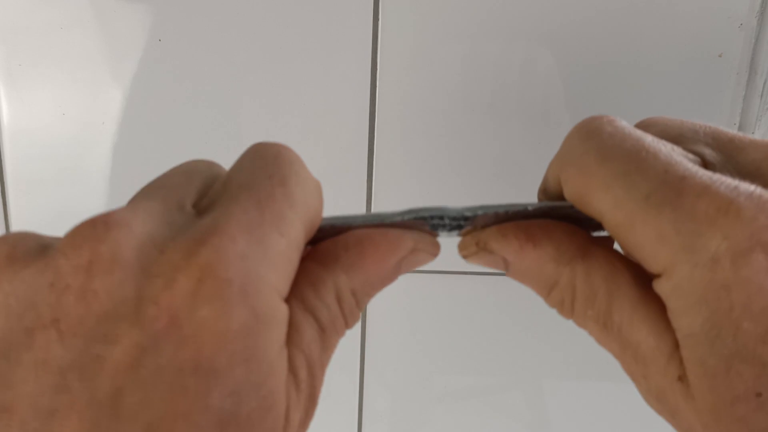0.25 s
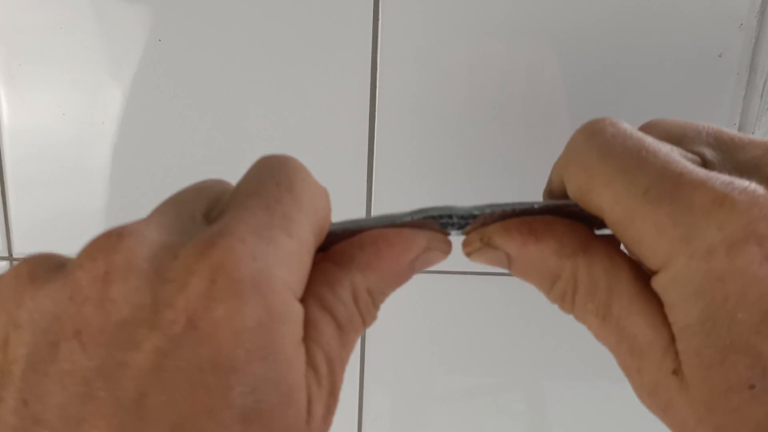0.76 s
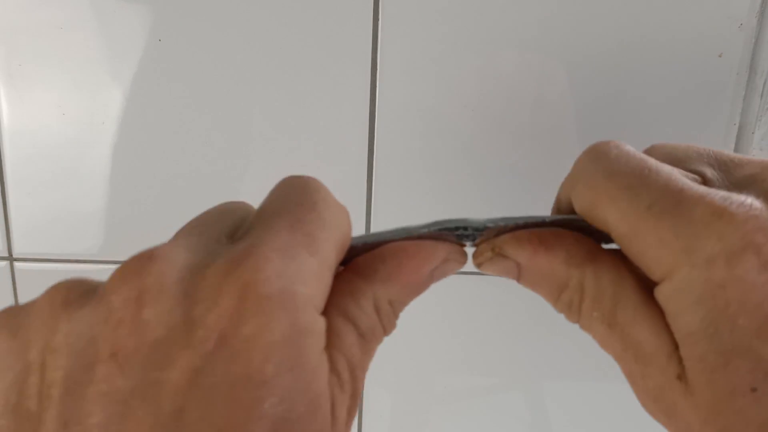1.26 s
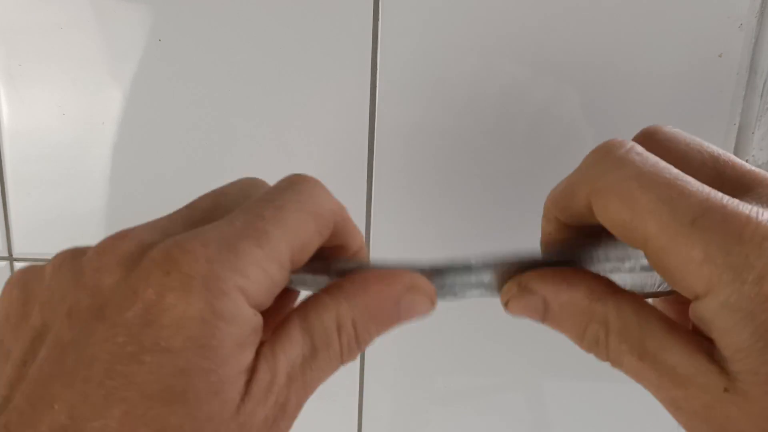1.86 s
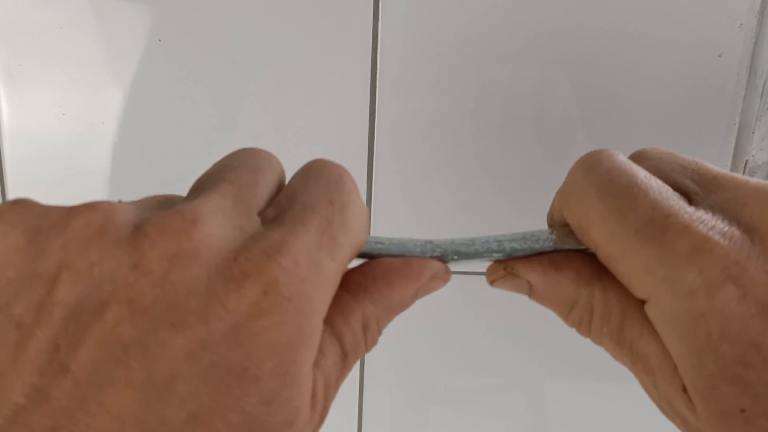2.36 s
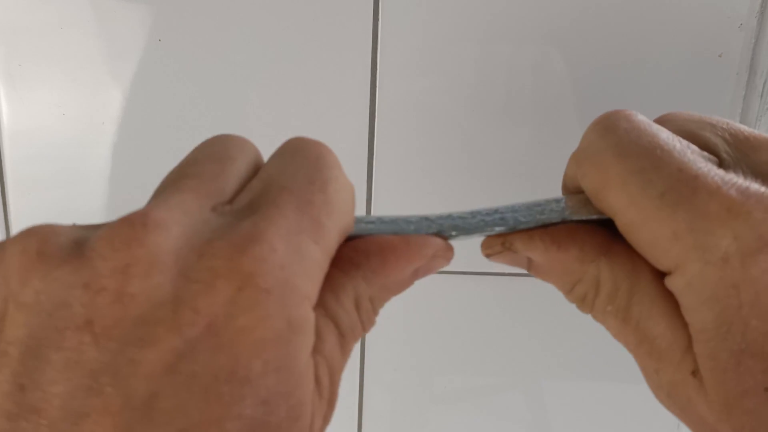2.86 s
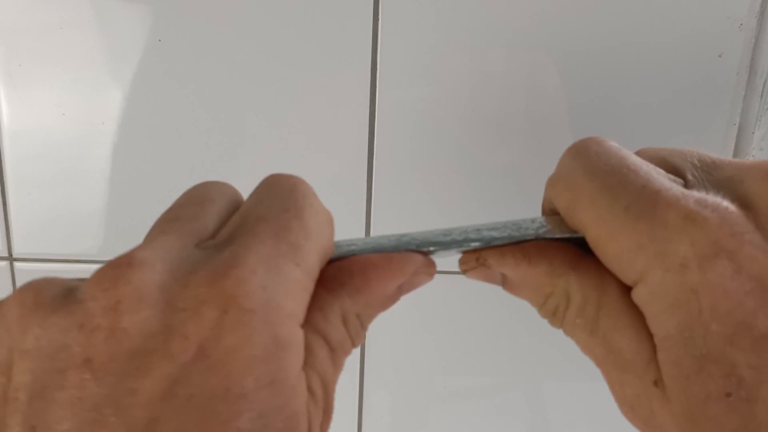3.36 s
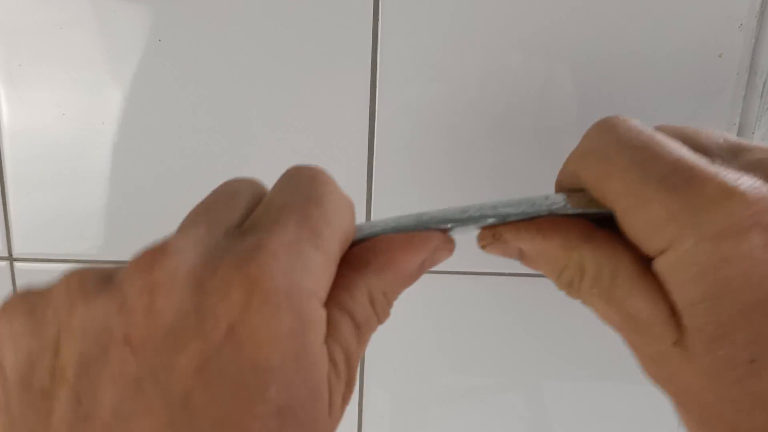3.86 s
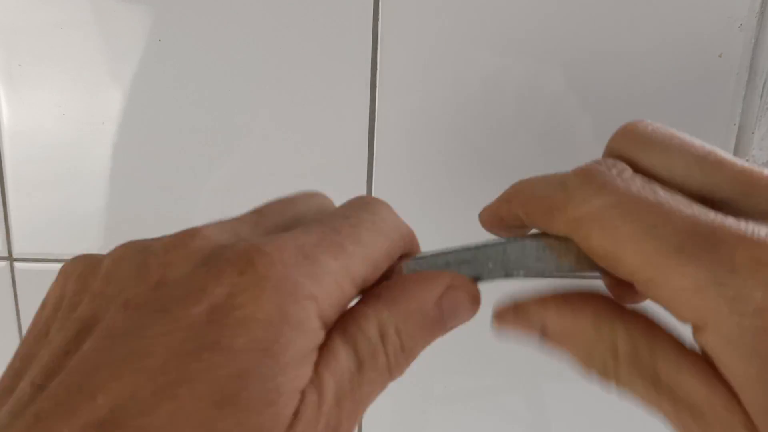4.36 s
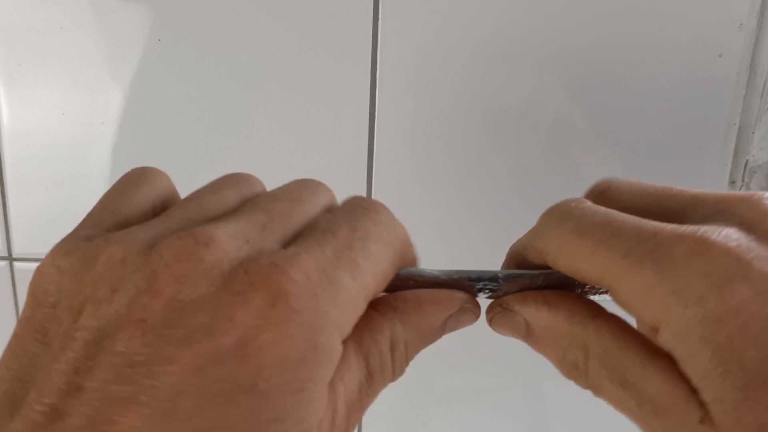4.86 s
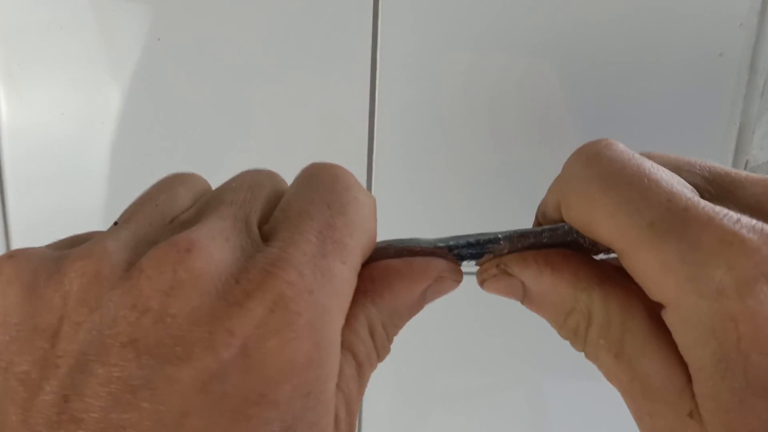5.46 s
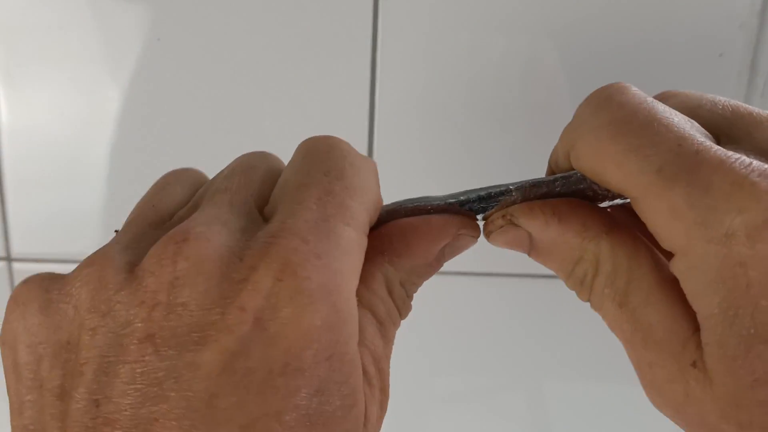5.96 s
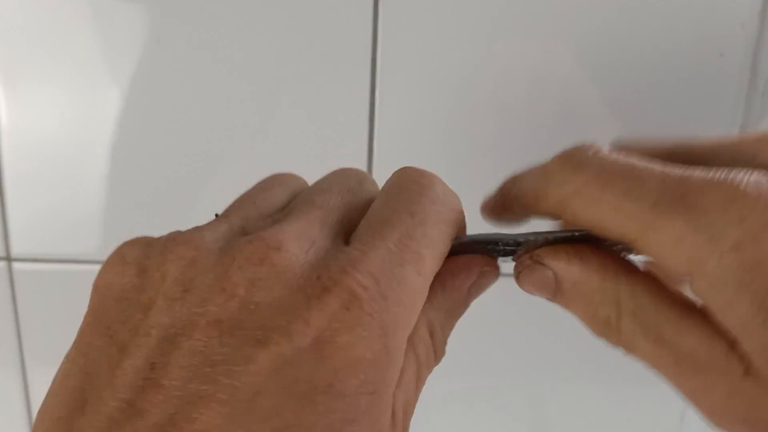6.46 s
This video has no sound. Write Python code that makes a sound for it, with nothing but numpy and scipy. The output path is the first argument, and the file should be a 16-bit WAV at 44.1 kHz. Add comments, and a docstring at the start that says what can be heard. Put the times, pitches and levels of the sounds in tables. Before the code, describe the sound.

A metal bar bent by hand gives off two stretches of dry crackling and sharp cracks, then faint ticks, in a quiet room.

```python
"""Bending a zinc bar.

Two hands bend it close to the microphone in a tiled room: two strong bends and a weak one.
Its crystals give way in avalanches of tiny slips: sharp cracks over a dry crackle.
The hands change grip with a soft knock and a rub; a faint tone sounds far off."""
import sys
import numpy as np
from scipy import signal
from scipy.fft import rfft, irfft
from scipy.io import wavfile
from scipy.ndimage import uniform_filter1d

SR = 44100
rng = np.random.default_rng(int(sys.argv[2]) if len(sys.argv) > 2 else 0)


def persist_wave(psi):
    """Save psi, clipped to +-1, as 16-bit WAV."""
    counts = np.round(np.clip(psi, -1, 1) * 32767).astype(np.int16)
    wavfile.write(sys.argv[1], SR, np.atleast_2d(counts).T)


N = 295911
TIME_S = np.arange(N) / SR

# microphone port cavities: centre_hz, width_hz, gain_db
LEFT_CAVITY = [(8400, 2600, 6), (13100, 1300, -6.5)]
RIGHT_CAVITY = [(6170, 2100, 8.7), (13650, 1330, 8.6)]


def from_db(db):
    """Decibels to gain."""
    return 10 ** (np.asarray(db) / 20)


def unit_rms(x):
    """Scale to unit rms."""
    return x / np.sqrt(np.mean(x ** 2) + 1e-20)


def at_hz(points, hz):
    """Read a table on a log-frequency axis."""
    points_hz, values = np.transpose(points)
    return np.interp(np.log(hz), np.log(points_hz), values)


def butter(x, hz, kind, order=2):
    """Butterworth filter."""
    return signal.sosfilt(signal.butter(order, hz, kind, fs=SR, output="sos"), x + 1e-18)


def stereo_noise(correlation, size=N):
    """White noise in two partly correlated channels."""
    white = rng.standard_normal((3, size))
    return np.sqrt(correlation) * white[0] + np.sqrt(1 - correlation) * white[1:]


def colour(x, spectrum, left=(), right=(), size=8192):
    """Minimum-phase filter of unit power: a spectrum plus resonances per channel."""
    hz = np.maximum(np.arange(size // 2 + 1) * SR / size, 1)
    peaks_db = [sum(db / (1 + (2 * (hz - centre_hz) / width_hz) ** 2) for centre_hz, width_hz, db in side)
                for side in (left, right)]
    gain = from_db([at_hz(spectrum, hz) + side_db for side_db in peaks_db])
    cepstrum = irfft(np.log(gain))
    cepstrum[:, 1:size // 2] *= 2
    cepstrum[:, size // 2 + 1:] = 0
    response = unit_rms(irfft(np.exp(rfft(cepstrum)))) / np.sqrt(size)
    return signal.oaconvolve(x, response, axes=1)[:, :N]


def add(out, start_s, sound):
    """Mix a sound in at a time."""
    i = int(start_s * SR)
    out[:, i:i + sound.shape[1]] += sound[:, :N - i]


def swells(rows):
    """Gain of overlapping bell-shaped swells, each 18 dB down at half_width_s from its peak."""
    return np.sqrt(sum(from_db(db) ** 2 / (1 + ((TIME_S - peak_s) / half_width_s) ** 2) ** 6
                       for peak_s, db, half_width_s in rows))


def room_air(level_db=-53, split_hz=1200):
    """Steady background, a little stronger on the left; long waves reach both ports more alike."""
    # still room: freq_hz, density_db
    spectrum = [(15, -43), (25, -2), (60, -2.5), (120, -3.5), (180, -6), (300, -7), (630, -10), (1050, -11),
                (2200, -11), (3600, -11.5), (5000, -17.5), (9000, -16), (15500, -15)]
    # background humps per side: centre_hz, width_hz, gain_db
    left_humps = [(87, 39, 4.5), (1716, 310, 5), (500, 7700, 7), (8040, 2500, 1.5)]
    right_humps = [(90.5, 16, 4), (1780, 200, 2.3)]
    bass = butter(stereo_noise(0.32), split_hz, "low")
    treble = butter(stereo_noise(0.061), split_hz, "high")
    return colour(bass + treble, spectrum, left_humps, right_humps) * from_db(level_db)


def yielding(release_db_per_s=400, sheen_fade_db_per_s=18):
    """The metal gives way steadily under load; returns crackle gain, low_ring_db, sheen_db."""
    # hand loads, hard for a bend, light for turning the bar over:
    # start_s, end_s, onset_db_per_s, level_db, growth_db_per_s, low_ring_db, sheen_db
    loads = [(0.334, 1.2, 160, -48, -1.5, 7.5, -25), (1.868, 2.35, 100, -65, -5, 7.5, -18),
             (2.758, 3.72, 1900, -30, -14, 4, 0.5), (4.038, 5.04, 300, -60.5, -12, 10, -13),
             (5.63, 6.046, 84, -57, 16, 6.5, 6.5)]
    power, low_ring, sheen = 0, 0, 0
    for start_s, end_s, onset_db_per_s, level_db, growth_db_per_s, low_ring_db, sheen_db in loads:
        held_s = np.clip(TIME_S, start_s, end_s) - start_s
        onset_db = onset_db_per_s * np.maximum(start_s - TIME_S, 0)
        release_db = release_db_per_s * np.maximum(TIME_S - end_s, 0)
        share = from_db(level_db + growth_db_per_s * held_s - onset_db - release_db) ** 2 + 1e-20
        power += share
        low_ring += share * low_ring_db
        sheen += share * (sheen_db - sheen_fade_db_per_s * held_s)
    return np.sqrt(power), low_ring / power, sheen / power


def slip_power(snap_s=0.00022, ring_s=0.0014, ring_db=-10, scatter_s=0.0085, scatter_db=-23):
    """Power after a slip, sum 1: a snap, a ring damped by the grip, scatter off the moving hands."""
    t = np.arange(1300) / SR
    ring = from_db(ring_db) ** 2 * np.exp(-t / ring_s)
    scatter = from_db(scatter_db) ** 2 * np.exp(-t / scatter_s)
    power = np.exp(-t / snap_s) + ring + scatter
    return power / power.sum()


def weight_lows(x, low_db, split_hz=4000):
    """Set how strongly slips shake the low bending modes."""
    return butter(x, split_hz, "high", order=3) + from_db(low_db) * butter(x, split_hz, "low", order=3)


def small_cracks(every_s=0.032, above_db=5, spread_db=4.5, count=260):
    """Strain lets go at uneven intervals, as strongly as the metal yields; rows for cracks()."""
    gain, load_low_db, _ = yielding()
    jitter, strength, place = rng.uniform(-1, 1, (count, 3)).T
    start_s = every_s * (np.arange(count) + 1 + jitter / 2)
    level_db = 20 * np.log10(np.interp(start_s, TIME_S, gain)) + above_db + spread_db * strength
    low_ring_db = np.interp(start_s, TIME_S, load_low_db) - 5.5
    pan_db = 7 + 9 * place
    return np.transpose([start_s, level_db, low_ring_db, pan_db])[start_s < TIME_S[-1]]


def cracks(snap_db=-3.5, gain_db=-12.5):
    """Single large slips: a sharp snap and a short ring, each with its own weight and direction."""
    # loudest cracks and lone ticks: start_s, level_db, low_ring_db, pan_db (left minus right)
    main_cracks = [(0.1846, -38, 7.5, -1), (0.273, -27, 3.5, 0), (0.4933, -22, 12, 2), (0.499, -18, 12, 5),
                   (0.5214, -30.5, 8, -4), (0.6592, -38, 15, 6), (0.6717, -21, 6.5, 5),
                   (0.7777, -26.5, 3, -4), (0.8157, -16.5, 6, 2), (0.9028, -12.5, 9, 2),
                   (0.9405, -15.5, 5, 0), (1.0325, -18, 3, -2.5), (1.067, -23, 9, 3), (1.1155, -17, -1, 4),
                   (1.1203, -14.5, 4, 0.5), (1.1459, -16.5, 7, -1), (1.1698, -15.5, 12, 9.5),
                   (1.1785, -11, 3, -5.5), (1.2194, -12, 3, -3.5), (1.6745, -43, 11, 2),
                   (1.751, -46, 10.5, 0), (2.7498, -32.5, -5, 12), (2.7909, -13.5, -13, 4),
                   (2.836, -13.5, -2, 4), (2.8829, -14, -0.5, 5), (3.014, -16, -4, -9),
                   (3.0284, -14.5, 0, -3.5), (3.1202, -20, -6, 9), (3.1989, -9, -2.5, -2),
                   (3.2343, -18, -6, 4), (3.291, -14.5, -15, 1), (3.325, -18.5, 3, 0),
                   (3.3643, -13, 0.5, 0), (3.4228, -26, -2, 10), (3.4927, -15.5, -1.5, 2),
                   (3.5283, -21.5, 4.5, 4), (3.5645, -7.5, 4.5, -1), (3.6142, -9.5, 1.5, 5),
                   (3.6752, -22, 5, -5), (3.7694, -17, 2.5, 3), (4.024, -37.5, 12, 4.5),
                   (4.1891, -44.5, 8, 1), (5.97, -39, 0, 12), (6.0265, -37, 3, 7), (6.3658, -40, 7.5, 2)]
    out = np.zeros((2, N))
    envelope = np.sqrt(slip_power())
    for start_s, level_db, low_ring_db, pan_db in [*main_cracks, *small_cracks()]:
        burst = envelope * stereo_noise(0.44, envelope.size)
        # the slip's place on the bar sets the lag between the ports
        lag_samples = rng.choice([0, 1, 2], size=2)
        burst[[0, 1], lag_samples] = from_db(snap_db) * rng.choice([-1, 1])
        gains = from_db(level_db + gain_db + np.array([[pan_db], [-pan_db]]) / 2)
        add(out, start_s, weight_lows(unit_rms(burst), low_ring_db) * gains)
    return out


def crackle(slips_per_s=380, spread_db=1.5, snap_db=-7, gain_db=-2.5):
    """Small slips come at random, most tiny, a few larger; they swell in avalanches."""
    # one slip sets off many: peak_s, level_db, half_width_s
    avalanches = [(0.45, -37.5, 0.055), (0.496, -18.5, 0.011), (0.68, -27, 0.031), (0.83, -39, 0.026),
                  (0.895, -28.5, 0.064), (1.06, -43, 0.027), (1.125, -33, 0.053), (2.872, -17.5, 0.038),
                  (2.958, -26, 0.013), (3.025, -19, 0.019), (3.1, -30, 0.073), (3.178, -26.5, 0.071),
                  (3.265, -29, 0.05), (3.365, -30, .07), (3.62, -31, 0.17), (3.772, -28.5, 0.029),
                  (4.92, -56, 0.028), (5.01, -55, 0.037), (5.72, -52.5, 0.045), (5.9, -43.5, 0.054)]
    # high rings of the bar: centre_hz, width_hz, gain_db
    high_rings = [(9100, 900, -3.5), (13600, 1300, -1)]
    steady, low_ring_db, sheen_db = yielding()
    slipping = rng.random(N) < slips_per_s / SR
    sizes = slipping * from_db(spread_db * np.minimum(rng.exponential(1, N), 3.1))
    power = np.maximum(signal.oaconvolve(sizes ** 2, slip_power())[:N], 0)
    snaps = from_db(snap_db) * sizes * rng.choice([-1, 1], N)
    slips = np.array([np.roll(snaps, 2), snaps]) + stereo_noise(0.34) * np.sqrt(power)
    # level out, so the bend sets the strain released in each short stretch
    slips /= np.sqrt(uniform_filter1d(power, size=1700) + 1e-6)
    slips *= np.hypot(steady, swells(avalanches)) * from_db(gain_db)
    slips = weight_lows(slips, low_ring_db)
    # the finest slips mostly sound the high rings
    sheen = sum(from_db(db) * butter(slips, [hz - width_hz / 2, hz + width_hz / 2], "band", order=1)
                for hz, width_hz, db in high_rings)
    return slips + from_db(sheen_db) * sheen


def bar():
    """Slips sound through the bar; turning it over in the hands shifts its low ring."""
    # radiated by a slip: freq_hz, density_db
    spectrum = [(60, -15), (200, -15), (370, -17), (490, -14), (750, -16), (1040, -19), (1180, -13),
                (1750, -14.5), (2300, -6.5), (3500, -6), (4500, -9), (5600, -2.5), (9500, 3), (11000, -2),
                (15500, -4)]
    # low ring per hold: start_s, end_s, centre_hz, width_hz, gain_db
    holds = [(0, 2.0, 2550, 1290, 3), (2.0, 7.0, 3530, 790, 3.5)]
    # low modes common to all holds: centre_hz, width_hz, gain_db
    bending_modes = [(512, 50, 2.5), (1147, 60, 4.5), (1447, 130, 4)]
    slips = cracks() + crackle()
    out = np.zeros((2, N))
    for start_s, end_s, *low_ring in holds:
        held = slips * (TIME_S >= start_s) * (TIME_S < end_s)
        rings = [low_ring, *bending_modes]
        out += colour(held, spectrum, [*LEFT_CAVITY, *rings], [*RIGHT_CAVITY, *rings])
    return out


def room(x, near_db=-10, near_s=0.0027, tail_db=-5, build_s=0.0009, size=26000):
    """Quick reflections off nearby tiles, then a tail dying band by band."""
    # room decay: freq_hz, t60_s
    decay = [(200, 0.49), (1000, 0.18), (2800, 0.29), (7000, 0.2), (15000, 0.16)]
    t = np.arange(size) / SR
    near = stereo_noise(0.46, size) * np.exp(-t / near_s) * (t > 0.001)
    edges_hz = np.geomspace(100, 18000, 11)
    tail = np.zeros((2, size))
    for low_hz, high_hz in zip(edges_hz, edges_hz[1:]):
        band = butter(stereo_noise(0.21, size), [low_hz, high_hz], "band")
        tail += band * from_db(-60 * t / at_hz(decay, np.sqrt(low_hz * high_hz)))
    tail *= 1 - np.exp(-t / build_s)
    response = from_db(near_db) * unit_rms(near) + from_db(tail_db) * unit_rms(tail)
    return signal.oaconvolve(x, response / np.sqrt(size), axes=1)[:, :N]


def knocks(pan_db=3, pivot_hz=270, size=5000):
    """The bar jolts in the hands: low modes damped by flesh; a harder jolt favours the upper ones."""
    # hand against bar: start_s, level_db, lowest_mode_db, tilt_db_per_octave
    jolts = [(0.4921, -29, -20, 3.5), (0.4973, -32, -20, -9), (4.237, -31, 0, -1)]
    # modes of the held bar: pitch_hz, t60_s, level_db
    held_modes = [(62, .07, -6), (177, 0.025, 0), (270, 0.081, -4), (463, 0.029, -5.5), (650, 0.018, -7.5),
                  (1114, 0.023, -15)]
    out = np.zeros((2, N))
    t = np.arange(size) / SR
    pitch_hz, t60_s, mode_db = np.transpose(held_modes)[:, :, None]
    modes = np.sin(2 * np.pi * pitch_hz * t) * from_db(mode_db - 60 * t / t60_s)
    modes[1::2] *= -1
    for start_s, level_db, lowest_mode_db, tilt_db_per_octave in jolts:
        struck = modes * from_db(tilt_db_per_octave * np.log2(pitch_hz / pivot_hz))
        thud = from_db(lowest_mode_db) * struck[0] + struck[1:].sum(axis=0)
        add(out, start_s, thud * from_db(level_db + np.array([[pan_db], [-pan_db]]) / 2))
    return out


def far_tone(peak_s=1.52, level_db=-65, half_width_s=0.42, top_s=1.56, top_hz=872, sag_hz_per_s2=950):
    """A faint far tone with its octave; the pitch rises and sinks again."""
    pitch_hz = top_hz - sag_hz_per_s2 * (TIME_S - top_s) ** 2
    phase = 2 * np.pi * np.cumsum(pitch_hz) / SR
    tone = np.sin(phase) + from_db(-5) * np.sin(2 * phase)
    return swells([(peak_s, level_db, half_width_s)]) * tone


def grip():
    """Hands shifting on the bar make a soft rumble."""
    # hand shifts: peak_s, level_db, half_width_s
    shifts = [(3.4, -55, .8), (3.92, -49.5, 0.058), (4.36, -55.5, 0.33), (4.545, -50, .05),
              (4.95, -59, 0.25)]
    # rumble: freq_hz, density_db
    spectrum = [(30, 1), (70, -5), (110, 4), (170, -0.5), (210, -7), (265, 2), (340, -16), (500, -14),
                (1200, -19), (4000, -26)]
    return colour(stereo_noise(0.52) * swells(shifts), spectrum)


def rub(rough_db=2.5, catch_hz=250):
    """Skin catches and slides on the cast surface."""
    # finger sliding along the bar: time_s, level_db
    slide = [(6.59, -71), (6.615, -39.5), (6.635, -50.5), (6.655, -43), (6.71, -50)]
    # skin friction: freq_hz, density_db
    spectrum = [(200, -6), (1000, -8.5), (2000, -8.5), (3300, -1), (4700, -12.5), (7000, -3.5),
                (10000, -2.5), (15500, -6)]
    envelope = from_db(np.interp(TIME_S, *np.transpose(slide)))
    catches = from_db(rough_db * unit_rms(butter(rng.standard_normal(N), catch_hz, "low")))
    return colour(stereo_noise(0.14) * catches * envelope, spectrum, LEFT_CAVITY, RIGHT_CAVITY)


def scene(knock_send_db=-7):
    """Bar and hands in the room; the dull hand sounds stay close, the tone lies in the background."""
    sharp = bar() + rub()
    thuds = knocks()
    direct = sharp + thuds + grip()
    reverb = room(sharp + from_db(knock_send_db) * thuds)
    return direct + reverb + room_air() + far_tone()


def record(dry, ceiling=0.85, cutoff_hz=15600):
    """Soft clipping, then a steep low-pass."""
    rounded = ceiling * np.tanh(dry / ceiling)
    lowpass = signal.firwin(301, cutoff_hz, fs=SR)
    return signal.oaconvolve(rounded, lowpass[None], mode="same", axes=1)


dry = scene()
out = record(dry)
persist_wave(out)
```